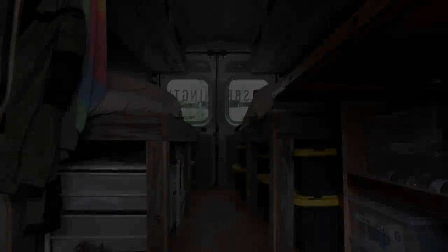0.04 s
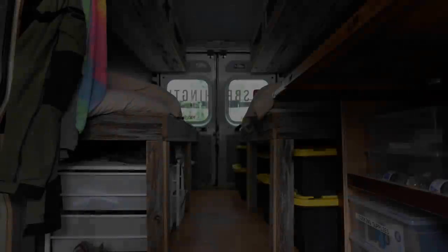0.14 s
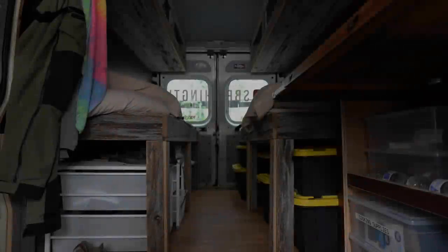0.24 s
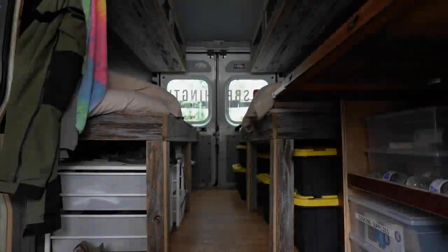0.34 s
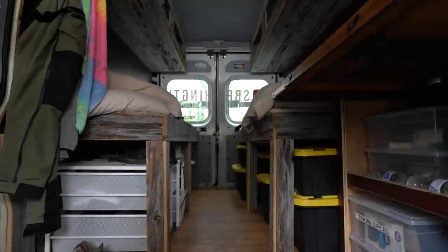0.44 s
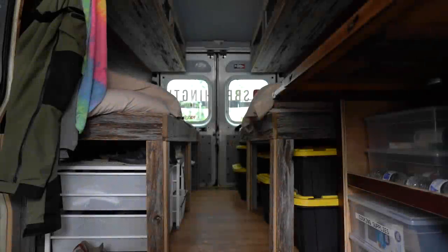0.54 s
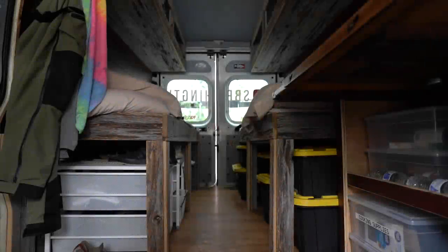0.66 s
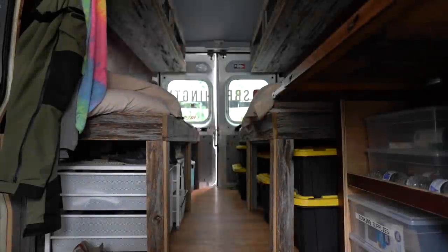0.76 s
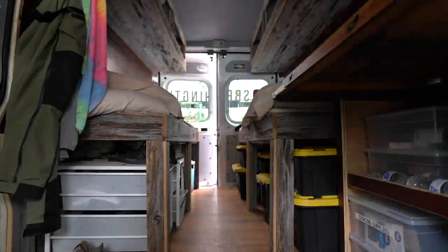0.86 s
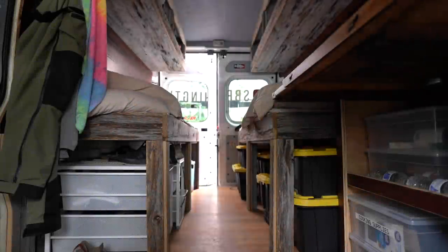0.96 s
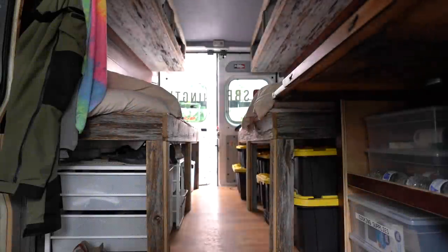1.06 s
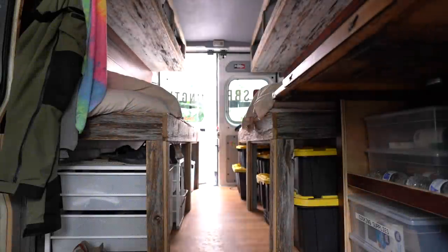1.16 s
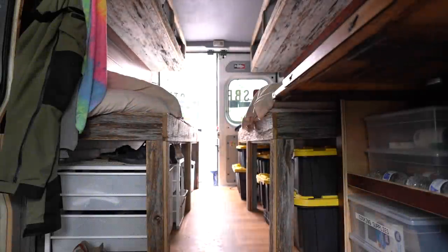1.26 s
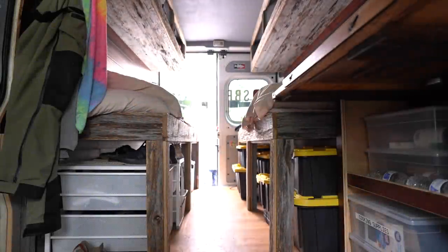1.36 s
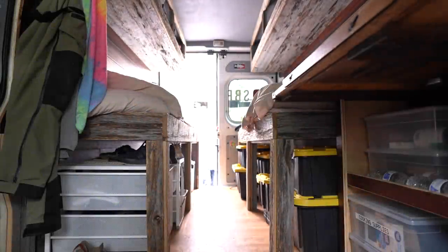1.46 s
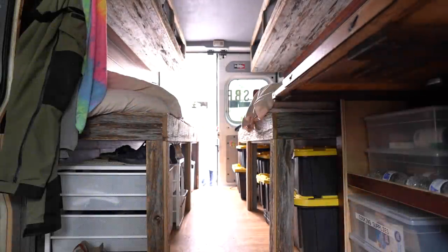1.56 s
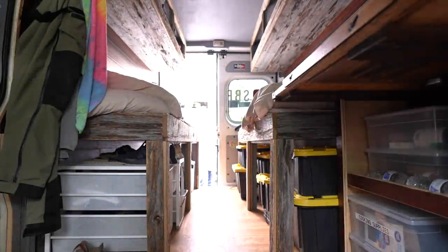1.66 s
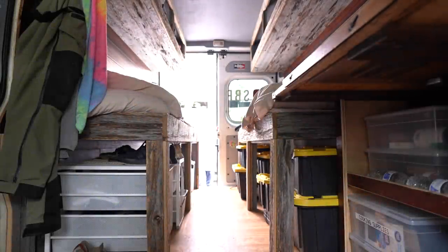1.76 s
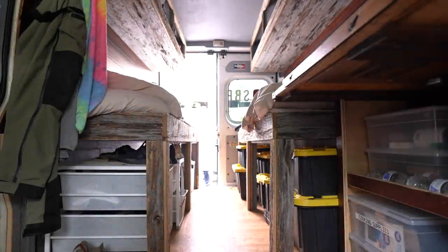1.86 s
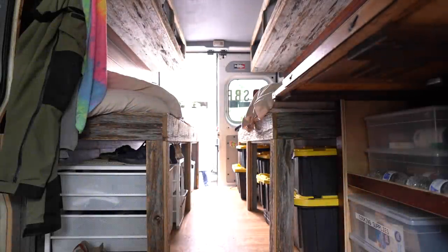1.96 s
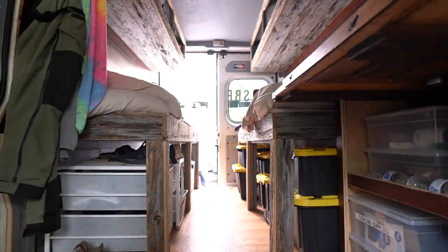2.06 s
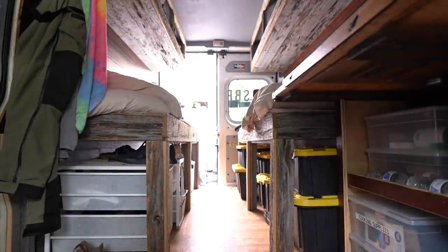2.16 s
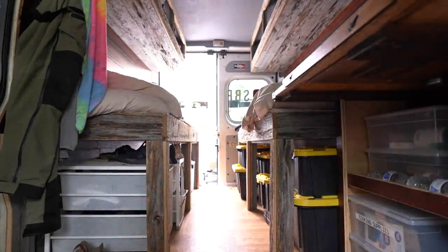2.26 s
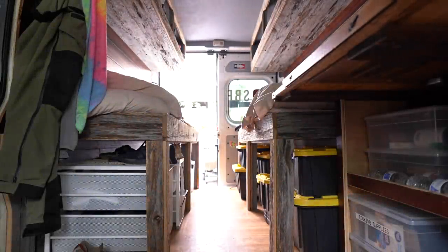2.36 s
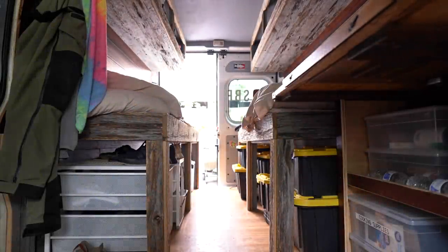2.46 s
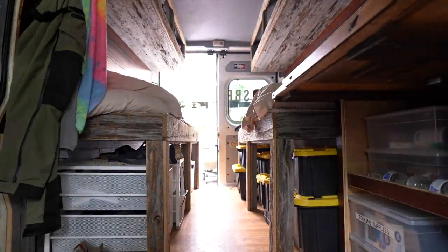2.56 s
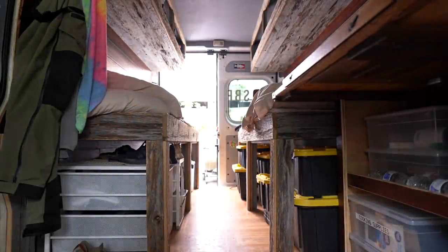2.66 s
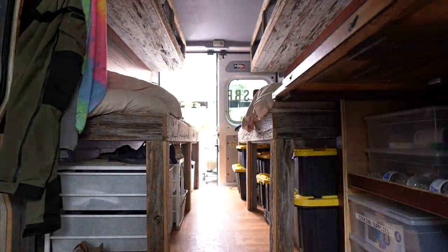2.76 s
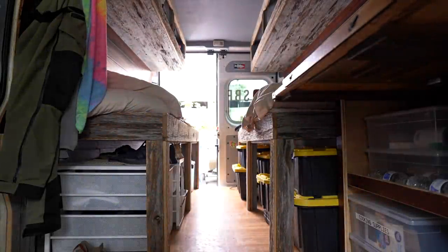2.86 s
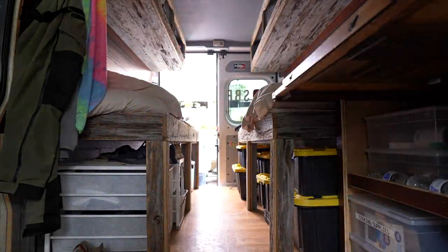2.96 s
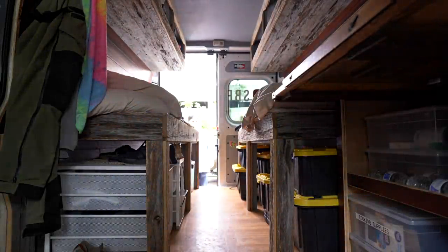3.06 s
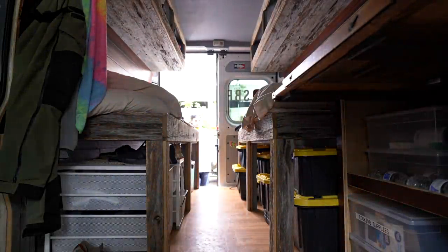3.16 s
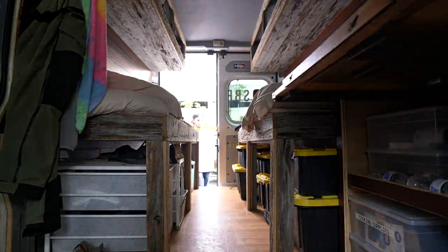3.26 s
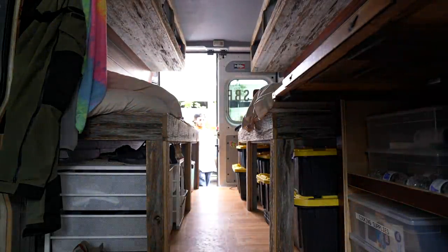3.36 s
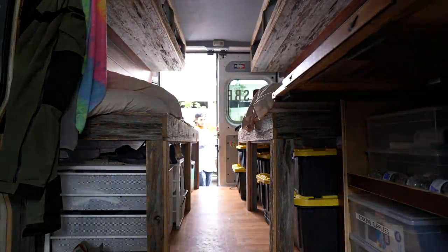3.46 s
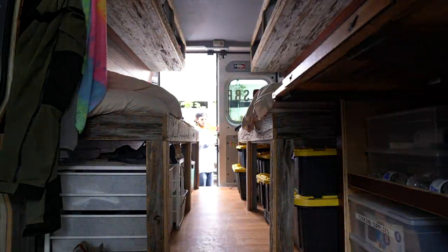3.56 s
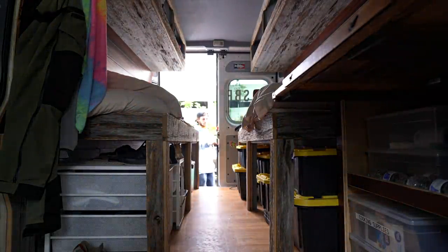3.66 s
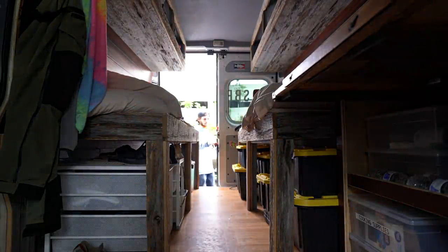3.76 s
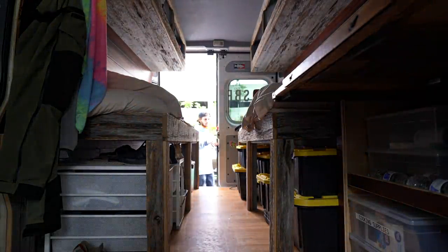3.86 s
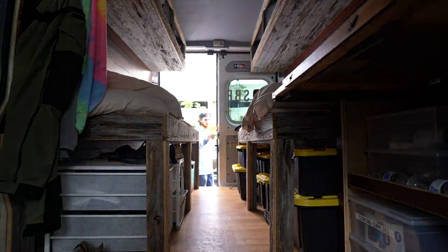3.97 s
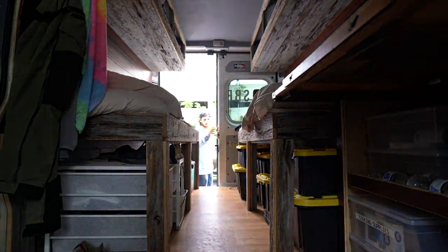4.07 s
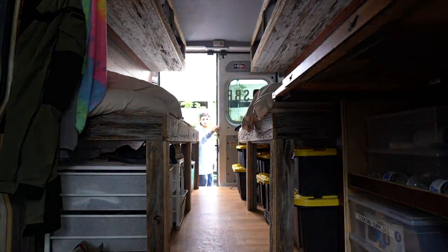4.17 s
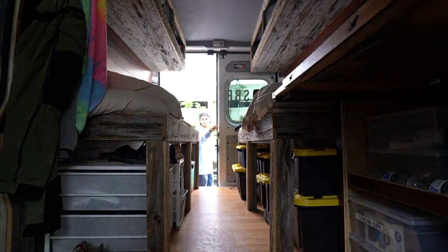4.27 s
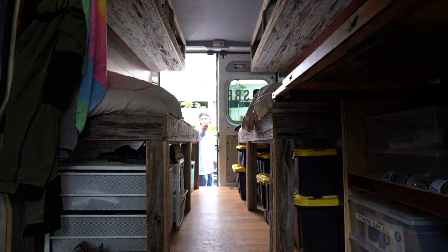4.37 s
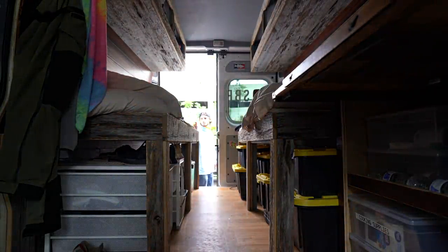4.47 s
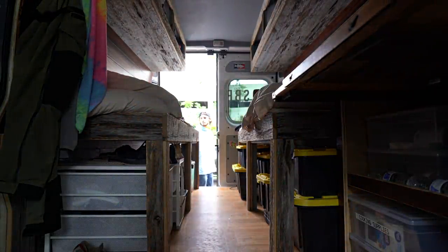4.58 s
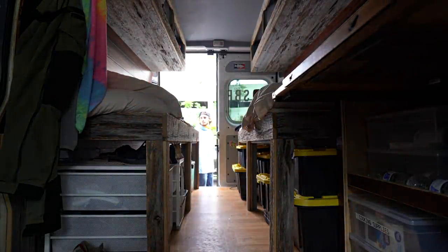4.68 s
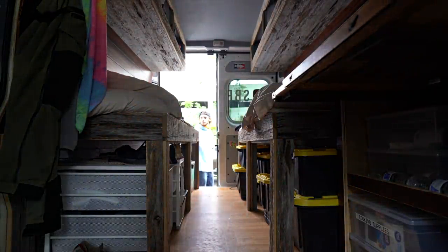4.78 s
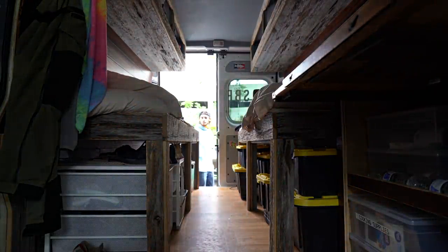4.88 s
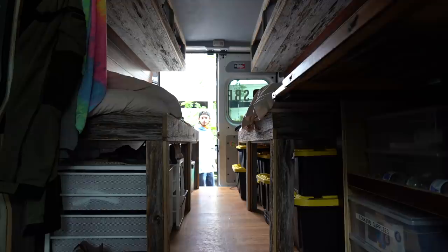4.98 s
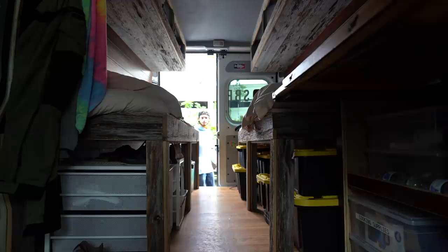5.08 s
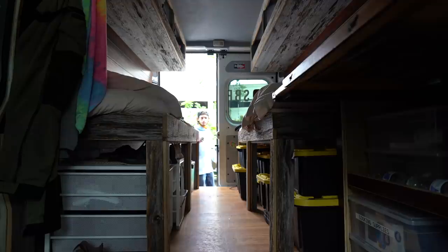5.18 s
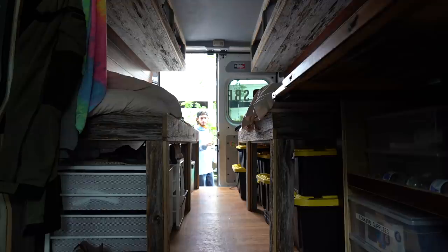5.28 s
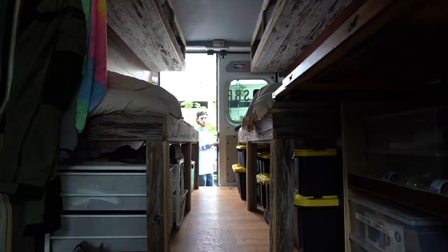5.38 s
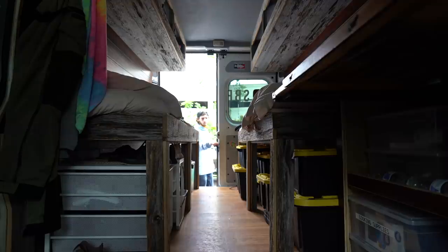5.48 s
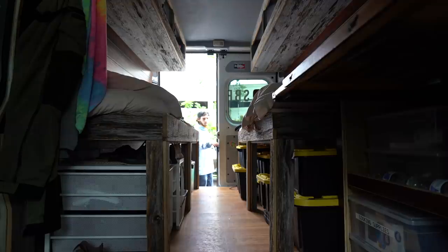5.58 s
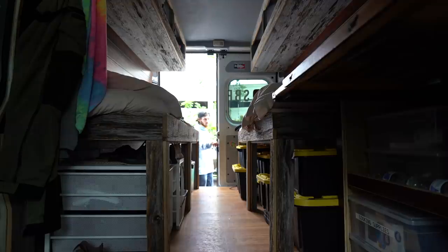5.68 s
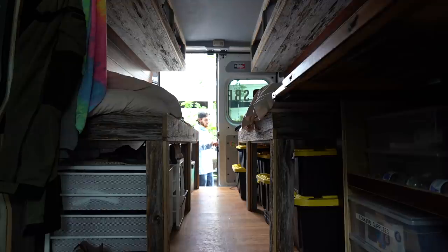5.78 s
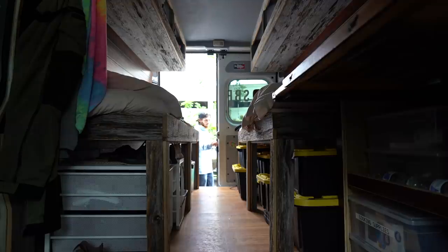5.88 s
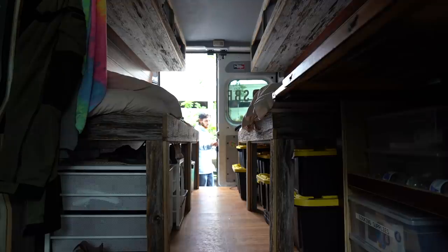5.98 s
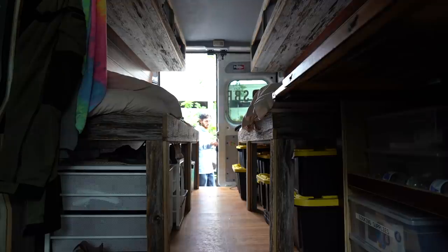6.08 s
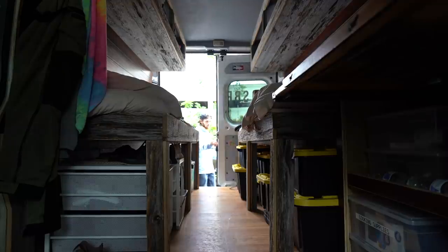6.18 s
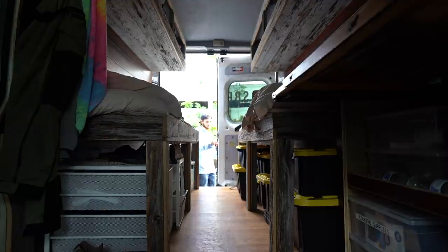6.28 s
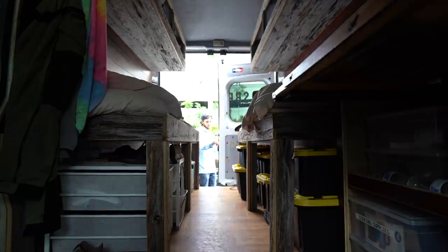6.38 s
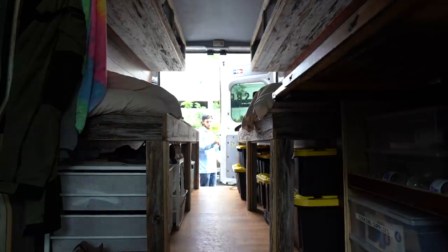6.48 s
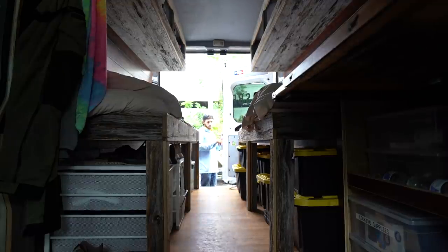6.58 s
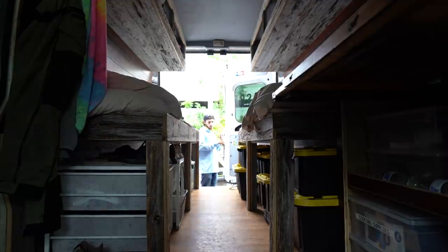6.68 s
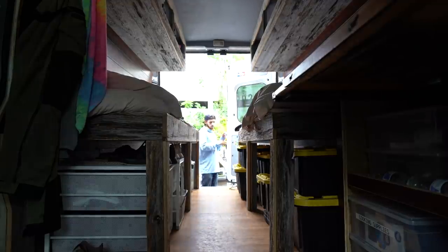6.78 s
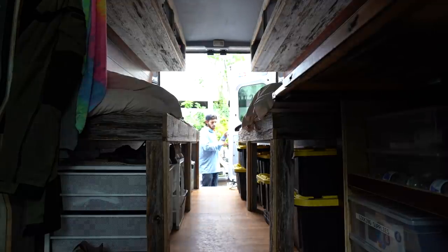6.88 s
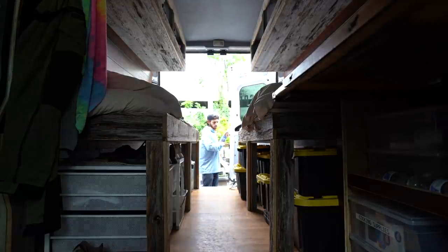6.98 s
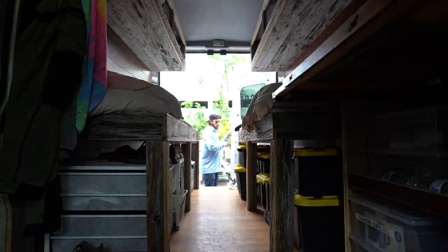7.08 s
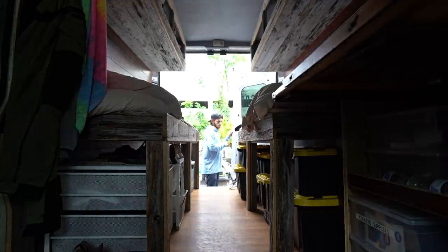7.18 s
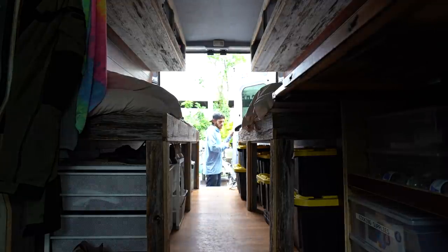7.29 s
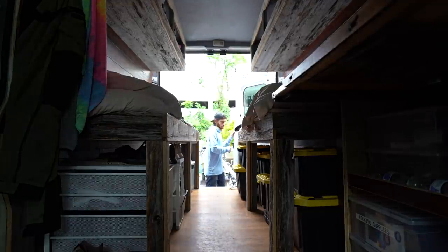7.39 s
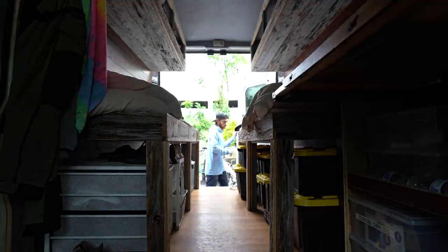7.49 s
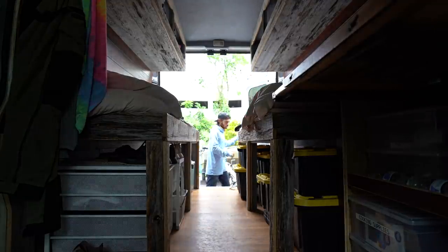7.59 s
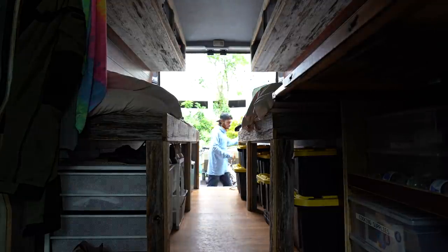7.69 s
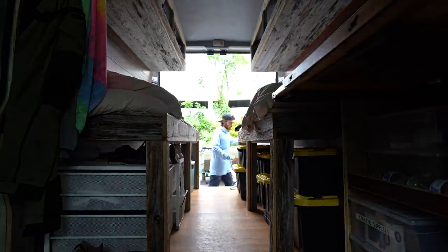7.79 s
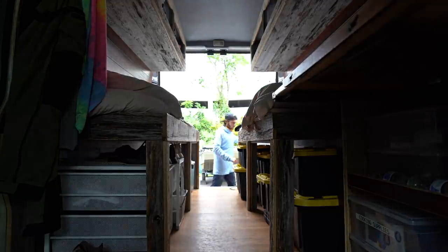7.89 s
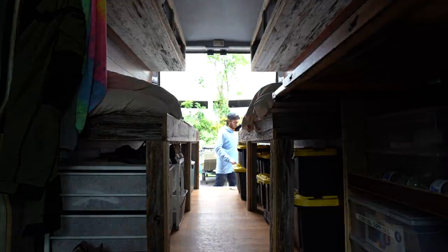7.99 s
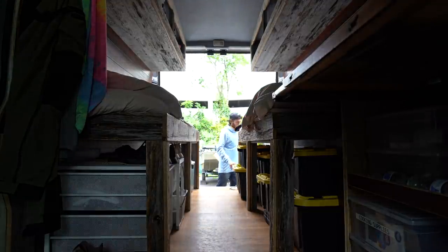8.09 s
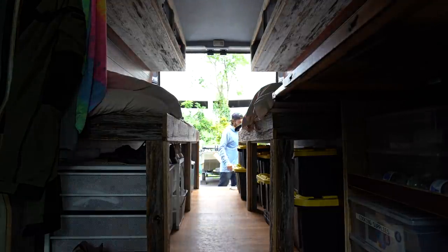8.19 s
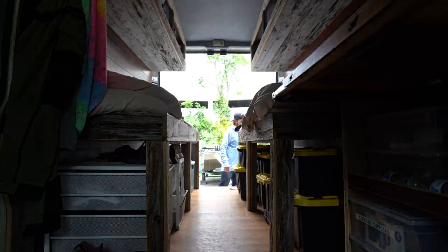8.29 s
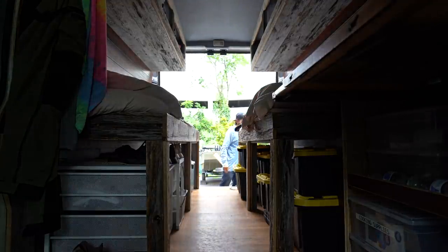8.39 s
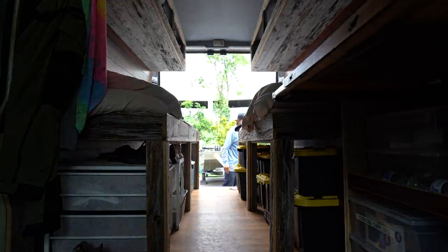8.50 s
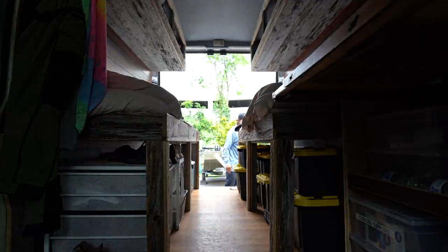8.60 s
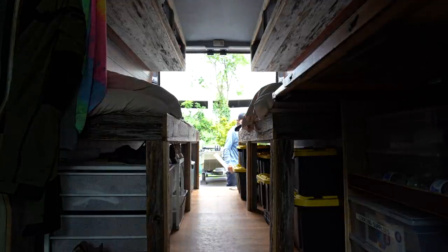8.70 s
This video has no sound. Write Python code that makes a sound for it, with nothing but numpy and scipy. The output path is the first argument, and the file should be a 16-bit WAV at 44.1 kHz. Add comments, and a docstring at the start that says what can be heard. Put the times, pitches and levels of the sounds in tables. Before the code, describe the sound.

A van's two metal back doors are opened from outside, with the microphone in the cargo area. The first latch rattles and clunks, and the door swings with a knock and a low shudder. After a few quiet seconds of light steps and clothing scuffs, the second latch cracks open and that door hits its stop with three fast, loud bangs. Faint distant rumble and airy hiss rise as the doorway opens.

```python
"""Two steel rear doors of a camper van are opened from outside, heard in the furnished cargo bay.
The left unlatches and swings over its hinge check; footsteps knock lightly; the right unbolts, swings out
and bangs three times on its stop. Each impact excites damped modes and booms in the cabin; a harder
contact is brighter. Friction sounds at the hinge pins, shoes and sleeves. Distant rumble, air and a
high hiss gain power as the open area of the doorway grows."""
import sys
import numpy as np
from scipy import signal
from scipy.fft import rfft, irfft, next_fast_len
from scipy.io import wavfile
from scipy.ndimage import uniform_filter1d

SR = 44100
rng = np.random.default_rng(int(sys.argv[2]) if len(sys.argv) > 2 else 0)


def transcribe(u):
    """Save the signal u as a 16-bit wav file named by the first command-line argument.

    u: samples, shape (n,) or (channels, n), limited to [-1, 1]; the rate is SR.
    q: integer samples, one column per channel.
    """
    v = np.clip(np.atleast_2d(u).T, -1, 1)
    q = np.round(v * 32767).astype(np.int16)
    wavfile.write(sys.argv[1], SR, q)


N = 385683
BLOW_SIZE = int(.7 * SR)
TIME = np.arange(N) / SR
BLOW_TIME = TIME[:BLOW_SIZE]
CUTOFF_HZ = 15900

# Bands of an impact, named boom, panel, clang, ring and tick:
# low f/Hz, high f/Hz, rise/s, base T60/s, crack weight, base power share of clear modes, tail level/dB
BANDS = [(24.9, 130, 0.007, 0.49, 1, .75, -18.5), (130, 700, .002, 0.26, 0, 0.29, -24),
         (740, 2600, 0.0077, 0.16, 1.26, 0.16, -32), (2632, 4910, 0.0022, 0.18, 0.33, 0.1, -36),
         (5000, CUTOFF_HZ, 0.0019, 0.17, 0.75, 0, -28)]
# Impacts: t/s, level/dB, tilt/(dB per octave), damping factor
LEFT_LATCH_HITS = [(.241, -56.5, -3.5, 1), (.397, -52, -1.6, 1.55), (.501, -61.5, -9, 1.1),
                   (.583, -46, 0.8, 1), (.636, -42.5, -0.4, 0.4), (.661, -31, 3.2, 0.62),
                   (.69, -23.5, 0.1, 1.21), (.762, -40, 1, 0.9), (.81, -48.5, 1.9, 0.92),
                   (.883, -54, -4, 1.5)]
KNOCK_HITS = [(1.265, -51, 4, 1.4), (1.304, -57, 1, 1.5), (1.331, -50, -0.8, 1.3), (1.409, -42, -.3, 0.76),
              (1.899, -62.5, -6, 1.2), (2.01, -65.5, -3.5, 2.6), (2.08, -47, -4, 1.8), (2.778, -67, 4, 1),
              (2.901, -65, -3, 3.2), (3.412, -58.5, -1.5, 1.5), (4.302, -55.5, 1.5, 1.8),
              (6.65, -57, 4.5, 2.2), (6.719, -65, 7.5, 1.8), (6.911, -57.5, .5, 2.8), (7.059, -60, 5.5, 1),
              (7.192, -55.5, 0.8, 0.47), (7.227, -50.5, 1, 1.4)]
CHECK_HITS = [(1.482, -37, 7, 1.5), (1.5, -31, -2.5, 1.57), (1.687, -48.5, -3, 0.96)]
RIGHT_LATCH_HITS = [(5.71, -45, 0.1, 0.9), (5.723, -46.5, -2, 1.6), (5.771, -48, -3, 0.7),
                    (5.812, -22.5, 2.47, 1.4), (5.879, -40, -1.5, 0.96), (5.986, -50.5, -1, 1.7),
                    (5.999, -49, -0.5, 0.87), (6.054, -53.5, -1.5, 0.69), (6.146, -58, -2, 3)]
STOP_HITS = [(6.301, -14.5, 0.14, 1.14), (6.375, -14.5, -0.5, 0.98), (6.459, -14.5, 0, 1.16)]
# Weighting of each source's contacts: level/dB in each of the five bands
LEFT_BAND_DB = (9, 6, -0.5, -10, -25)
KNOCK_BAND_DB = (-1, 2.5, -1, -8.5, -24)
CHECK_BAND_DB = (-14, 6, -1, -6.5, -25)
SCUFF_BAND_DB = (16.5, 7.5, 2, 0, -11.5)
RIGHT_BAND_DB = (8, 6, -.5, -4.5, -20.5)
STOP_BAND_DB = (-1, -2, 0, -10.5, -22)
# Normal modes excited by each kind of impact: f/Hz, relative level/dB
LEFT_PARTIALS = [(57, -1.5), (44.1, -2.5), (85, 6), (127.7, -22), (171, 4.5), (241.4, -6.5), (361, 1),
                 (422, -1), (552, -6.5), (701, 3), (906, -13.5), (990, -8), (1145, -6), (1750, -29),
                 (3500, -14), (4270, -25)]
KNOCK_PARTIALS = [(55, -22), (82, -27), (150, -16), (177, -7), (323, -2), (383, -1), (445, -1.5),
                  (511, 0.5), (665, -5), (770, -13), (1174, -6), (1334, -30.5), (1720, -24), (2250, -11.5),
                  (2900, -27), (3650, -28), (4250, -36)]
RIGHT_PARTIALS = [(43, -0.5), (57, -4.5), (81, 2), (140, -2.5), (176, -4), (239, -5), (318, -3), (420, -13),
                  (511, -11.5), (958, -15), (1392, -12), (1814, -13), (2169, -11), (2799, 4), (3063, -3.5),
                  (3418, -3.5), (3600, -6), (4200, -7.5)]
STOP_PARTIALS = [(65.9, 7), (46, -2), (79.4, -7), (123.2, -8), (166, -5.5), (216.6, -0.5), (249, 2),
                 (307, -6.5), (346, 0), (385, -6.5), (512.7, -9.5), (944, -4.5), (1215, -6), (1266, -6),
                 (1307, -5.5), (1442, -1), (1624, -11), (1798, -18), (1725, -14), (2025, -0.5), (2170, -9),
                 (2130, -13.5), (2350, -30.5), (2900, -13.5), (3340, -18), (3380, -19.5), (3793, -17)]
# Spectral density of the dense, unresolved modes: f/Hz, relative level/dB
LEFT_SPECTRUM = [(15, -44), (25, -1), (78, 4.5), (113, -20.5), (161, -11), (299, -22), (437, -13.5),
                 (572, -26), (1010, -29), (2460, -39), (3490, -32), (4690, -43.5), (15800, -61)]
KNOCK_SPECTRUM = [(15, -51), (25, -8), (53, 20), (133, -4.5), (179, -4.5), (255, -8.5), (291, -6),
                  (400, -6), (620, -21.5), (905, -33.5), (981, -28), (1060, -29), (1390, -24.5),
                  (3300, -37), (15800, -59)]
RIGHT_SPECTRUM = [(15, -26.5), (25, -3.5), (86, -11), (261, -25.5), (425, -16.5), (557, -29), (729, -21.5),
                  (1060, -21.5), (1430, -25.5), (1590, -27.5), (2150, -27), (2520, -33), (3390, -37.5),
                  (5820, -51.5), (15800, -64.5)]
STOP_SPECTRUM = [(15, -46), (25, -14), (64, -2), (179, -13.5), (255, -10), (284, -14), (361, -7.5),
                 (604, -22), (929, -24.5), (1120, -18), (1430, -17), (2090, -17), (2590, -21), (3680, -31),
                 (15800, -58)]
# Spectral density of the outdoor and handling noises: f/Hz, relative level/dB
OUTDOOR_SPECTRUM = [(12, -43.5), (20, -11.5), (37, -3), (59, 3.5), (126, -12), (209, -24.5), (247, -22.5),
                    (554, -30), (620, -26.5), (2650, -43.5), (3700, -45.5), (5030, -52), (6650, -44.5),
                    (8090, -54.5), (15800, -55)]
HISS_SPECTRUM = [(5000, -24), (6000, -11), (6450, 0), (7250, -1.5), (7900, -11.5), (9500, -25.5)]
RUB_SPECTRUM = [(400, -12), (1200, -1.5), (2400, -5.5), (3300, -1.5), (4200, -5.5), (5200, -14.5),
                (9000, -24.5), (15000, -19.5)]
SHUDDER_SPECTRUM = [(30, -4.5), (60, 3), (130, -14.5), (220, -19), (450, -24.5), (900, -34.5)]
SCUFF_SPECTRUM = [(15, -28), (25, -9.5), (80, 1.5), (299, -10), (461, -7.5), (769, -26), (1120, -26),
                  (1820, -30), (3680, -60), (5670, -45.5), (15800, -45)]
# Peaks and dips on those spectra: f/Hz, width/Hz, gain/dB
RUB_PEAKS = [(520, 16, 19.5), (3600, 400, 0)]
KNOCK_PEAKS = [(164.4, 20, 5.5), (710, 1000, 8.5), (1710, 180, 0.85), (3800, 1000, 4.1)]
SCUFF_PEAKS = [(297, 41, 2), (716, 120, -4), (3740, 700, 16), (4120, 450, 4)]
RIGHT_PEAKS = [(148, 42, 9.9), (3300, 440, 1.7), (3970, 650, 3.5)]
STOP_PEAKS = [(267, 26, 14), (366, 70, -2.5), (680, 56, 4), (966, 36, 9.5), (1350, 150, 11), (2140, 250, 7),
              (2680, 170, -6)]
# Each door uncovering its half of the doorway: t/s, duration/s
DOOR_OPENINGS = [(.75, 1.3), (5.9, 1.8)]
# Ringing of small loose fittings: t/s, f/Hz, level/dB
FITTING_PINGS = [(.763, 4200, -47.5), (.811, 3500, -49), (1.483, 4280, -49), (2.082, 1674, -47),
                 (5.816, 3367, -23.5), (6.913, 4200, -60), (7.158, 378, -51.5), (7.192, 697, -53.5),
                 (7.228, 3980, -57)]
# Pushes that swing a door: t/s, half length/s, rub level/dB, shudder level/dB
DOOR_PUSHES = [(1.01, 0.27, -69, -44), (1.548, 0.42, -60.5, -44), (1.965, 0.2, -79, -39.5),
               (6.646, .4, -57.5, -41.5), (7.701, 0.42, -60, -50)]
# Contacts of shoes, sleeves and hands: t/s, half length/s, level/dB, tilt/(dB per octave)
SOFT_CONTACTS = [(2.566, 0.026, -67, -1.3), (3.463, 0.023, -59, 2.8), (3.643, 0.056, -67.5, 1.2),
                 (4.295, .027, -61, -0.2), (5.042, 0.021, -69.5, -5), (5.445, 0.03, -67.5, -5),
                 (7.542, 0.016, -58, 2.9), (7.648, 0.031, -63.5, 2.5), (7.756, 0.02, -53, 4),
                 (7.811, 0.027, -62, -1.1)]


def from_db(db):
    """Amplitude ratio of a level."""
    return 10 ** (np.asarray(db) / 20)


def unit_rms(x, first=None):
    """Normalisation to rms 1, over the whole signal or its first samples."""
    return x / np.sqrt(np.mean(x[:first] ** 2) + 1e-20)


def unit_blow(x):
    """Normalisation to rms 1 over the first 40 ms."""
    return unit_rms(x, first=SR // 25)


def noise(spectrum, low_hz, high_hz, size=N, peaks=()):
    """Spectral shaping of white noise between two steep band edges; rms 1."""
    padded = next_fast_len(size)
    hz = np.maximum(np.fft.rfftfreq(padded, 1 / SR), 1)
    point_hz, point_db = np.transpose(spectrum)
    db = np.interp(np.log(hz), np.log(point_hz), point_db)
    for centre, width, gain_db in peaks:
        db += gain_db / (1 + (2 * (hz - centre) / width) ** 2)
    edges = 1 / np.sqrt((1 + (low_hz / hz) ** 20) * (1 + (hz / high_hz) ** 20))
    white = rfft(rng.standard_normal(padded))
    return unit_rms(irfft(white * from_db(db) * edges, padded)[:size])


def decay(t60, bend=1):
    """Damping by 60 dB in t60 seconds; a bend above 1 slows the start."""
    return np.exp(-np.log(1000) * (BLOW_TIME / t60) ** bend)


def swell(t, half):
    """Gaussian rise and fall about time t."""
    return np.exp(-np.minimum(((TIME - t) / half) ** 2, 20))


def add(out, t, sound):
    """Superposition of a sound from time t."""
    start = int(t * SR)
    out[start:start + len(sound)] += sound[:N - start]


def band_gain(k, band_db, level_db, tilt, pivot_hz=1380, flat_below_hz=330):
    """Contact hardness tilts the spectrum about a pivot, setting the amplitude in band k."""
    low, high, *_ = BANDS[k]
    octaves = np.log2(max(np.sqrt(low * high), flat_below_hz) / pivot_hz)
    return from_db(level_db + band_db[k] + tilt * octaves)


def outdoors():
    """Transmission through an aperture: power grows with open area, above a leak past the shut doors."""
    area = sum(np.clip((TIME - t) / duration, 0, 1) for t, duration in DOOR_OPENINGS)
    rumble = from_db(-48) * np.sqrt(area + .28) * noise(OUTDOOR_SPECTRUM, 38, 150)
    air = from_db(-59.5) * np.sqrt(area + .093) * noise(OUTDOOR_SPECTRUM, 140, 4600)
    hiss = from_db(-76) * np.sqrt(area + .03) * noise(HISS_SPECTRUM, 5000, 9500)
    return rumble + air + hiss


def impacts(hits, band_db, partials, spectrum, peaks=(), *, purity, hardness=1, repeat_share=.35):
    """Free vibration after a blow: clear and dense modes decay together, the boom lasting longest."""
    out = np.zeros(N)
    first_wave = hardness * np.exp(-((BLOW_TIME - .0035) / .0044) ** 2)   # ahead of the reflections
    for k, (low, high, rise, t60, crack, clear, tail_db) in enumerate(BANDS):
        clear = min(clear * purity, .9)
        attack = (1 - np.exp(-(BLOW_TIME / rise) ** 2)) * (1 + crack * first_wave)
        tail = from_db(tail_db) * decay(t60=.77)
        modes = [from_db(db) * np.sin(2 * np.pi * hz * BLOW_TIME)
                 for hz, db in partials if low <= hz < high]
        modes = np.reshape(modes, (-1, BLOW_SIZE))
        ringing = noise(spectrum, low, high, 3 * BLOW_SIZE, peaks)
        for t, level_db, tilt, damping in hits:
            # The contact point shifts, reweighting the modes and renewing part of the dense ringing.
            weights = from_db(2.5 * rng.standard_normal(len(modes)))
            tones = unit_blow(weights @ modes)
            fresh = ringing[rng.integers(BLOW_SIZE, 2 * BLOW_SIZE):][:BLOW_SIZE]
            repeated = np.sqrt(repeat_share) * ringing[:BLOW_SIZE]
            dense = unit_blow(repeated + np.sqrt(1 - repeat_share) * fresh)
            body = np.sqrt(clear) * tones + np.sqrt(1 - clear) * dense
            # Early reflections sustain the blow before the furnishings absorb it.
            envelope = decay(t60 / damping, bend=1.11)
            blow = unit_blow(attack * (body * envelope + fresh * tail))
            add(out, t, band_gain(k, band_db, level_db, tilt) * blow)
    return out


def left_latch():
    """Impacts of handle and latch excite the modes of the left door."""
    return impacts(LEFT_LATCH_HITS, LEFT_BAND_DB, LEFT_PARTIALS, LEFT_SPECTRUM, purity=.78)


def loose_fittings(spread=.06):
    """Closely spaced modes beat as each fitting rings down."""
    out = np.zeros(N)
    for t, hz, db in FITTING_PINGS:
        cluster_hz = hz * (1 + spread * rng.standard_normal((6, 1)))
        ring = rng.standard_normal(6) @ np.sin(2 * np.pi * cluster_hz * BLOW_TIME)
        add(out, t, from_db(db) * unit_blow(ring * decay(t60=.06)))
    return out


def door_swing():
    """Friction at the hinge pins and shudder of the panel rise and fall with the door's speed."""
    _, _, rub_db, shudder_db = np.transpose(DOOR_PUSHES)
    speeds = np.array([swell(t, half) for t, half, *_ in DOOR_PUSHES])
    rub = from_db(rub_db) @ speeds * noise(RUB_SPECTRUM, 400, 15000, peaks=RUB_PEAKS)
    shudder = from_db(shudder_db) @ speeds * noise(SHUDDER_SPECTRUM, 23, 1400)
    return rub + shudder


def knocks_and_footsteps():
    """Impact excitation: light knocks and ticks of the doors, and of footsteps between the openings."""
    return impacts(KNOCK_HITS, KNOCK_BAND_DB, KNOCK_PARTIALS, KNOCK_SPECTRUM, KNOCK_PEAKS, purity=.97)


def check_arm():
    """Impulses drive damped modes as the arm snaps over its notch and settles."""
    return impacts(CHECK_HITS, CHECK_BAND_DB, KNOCK_PARTIALS, KNOCK_SPECTRUM, KNOCK_PEAKS, purity=.69)


def scuffs():
    """Sliding friction of soft contacts: noise swells add in power, with a grain in the upper bands."""
    out = np.zeros(N)
    grain_db = unit_rms(uniform_filter1d(rng.standard_normal(N), size=130))
    grain = unit_rms(from_db(grain_db))
    _, _, level_db, tilt = np.transpose(SOFT_CONTACTS)
    swells = np.array([swell(t, half) for t, half, *_ in SOFT_CONTACTS])
    for k, (low, high, *_) in enumerate(BANDS):
        power = band_gain(k, SCUFF_BAND_DB, level_db, tilt) ** 2 @ swells
        friction = noise(SCUFF_SPECTRUM, low, high, peaks=SCUFF_PEAKS)
        out += np.sqrt(power) * friction * (grain if k > 1 else 1)
    return out


def right_latch():
    """Hard impacts of lever and bolts excite the modes of the right door with a sharper crack."""
    return impacts(RIGHT_LATCH_HITS, RIGHT_BAND_DB, RIGHT_PARTIALS, RIGHT_SPECTRUM, RIGHT_PEAKS,
                   purity=1.1, hardness=1.6)


def door_stop(pad_lead_s=.005):
    """Rebound of the right door on its stop: a compliant rubber pad touches dully before the steel."""
    steel = impacts(STOP_HITS, STOP_BAND_DB, STOP_PARTIALS, STOP_SPECTRUM, STOP_PEAKS,
                    purity=2.1, hardness=1.6)
    rubber = signal.butter(1, [150, 900], "band", fs=SR, output="sos")
    pad = np.interp(TIME + pad_lead_s, TIME, signal.sosfilt(rubber, steel))
    return steel + from_db(-15.5) * pad


def scene():
    """Linear superposition of all sources in one channel."""
    return (outdoors() + left_latch() + loose_fittings() + door_swing() + knocks_and_footsteps()
            + check_arm() + scuffs() + right_latch() + door_stop())[None]


def record(dry, hiss_db=-69.5, fade_in_s=.56):
    """Microphone self-noise is added; the sum fades in, clips at full scale and is low-pass filtered."""
    hiss = from_db(hiss_db) * rng.standard_normal(N)
    fade_in = np.clip(TIME / fade_in_s, 0, 1)
    clipped = np.clip((dry + hiss) * fade_in, -1, 1)
    low_pass = signal.ellip(10, .2, 80, CUTOFF_HZ, fs=SR, output="sos")
    return signal.sosfilt(low_pass, clipped)


dry = scene()
out = record(dry)
transcribe(out)
```